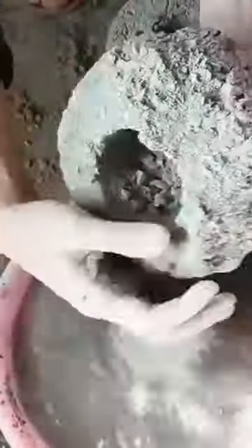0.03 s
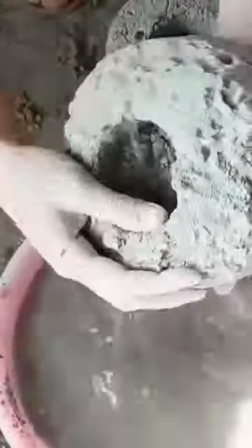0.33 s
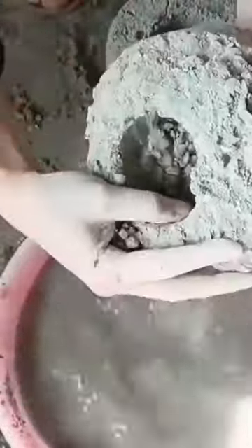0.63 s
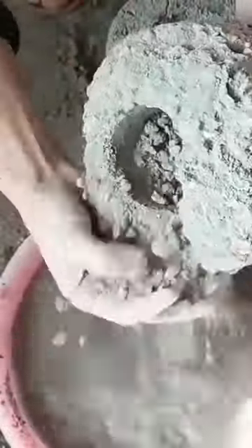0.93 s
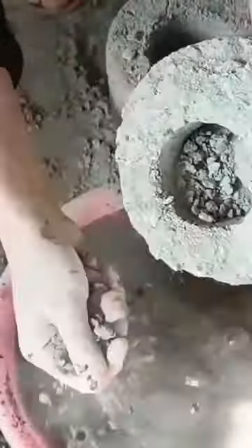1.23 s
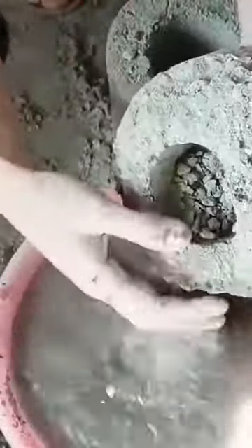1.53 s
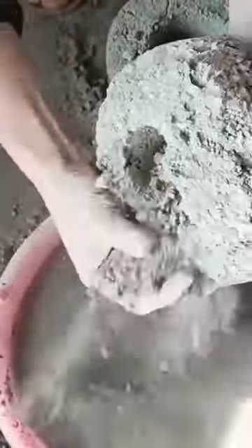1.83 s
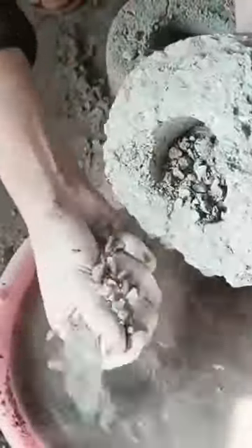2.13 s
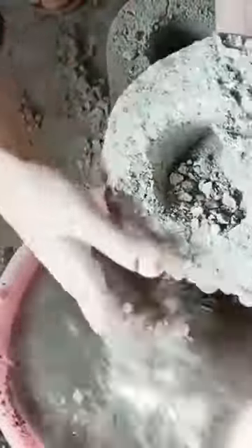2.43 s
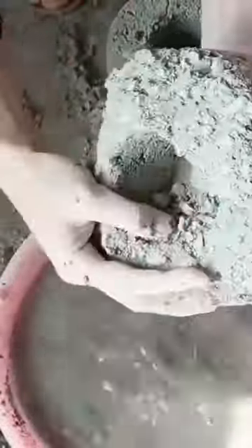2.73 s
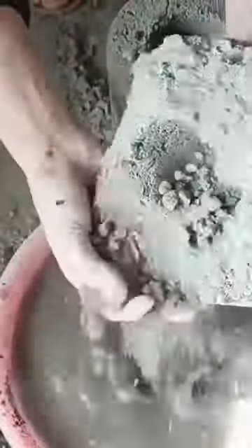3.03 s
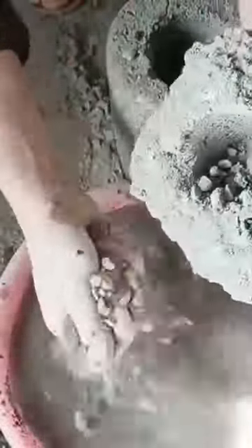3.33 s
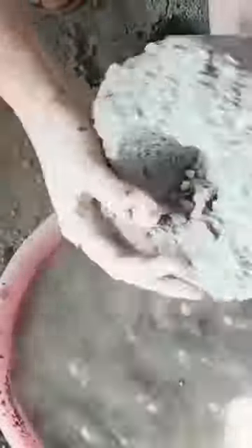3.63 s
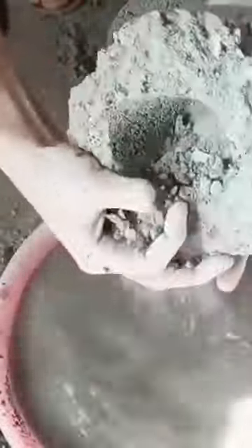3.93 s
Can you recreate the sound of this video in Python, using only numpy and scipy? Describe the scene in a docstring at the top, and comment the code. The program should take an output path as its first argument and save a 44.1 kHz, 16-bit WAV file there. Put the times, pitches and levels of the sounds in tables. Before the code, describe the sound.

Dry cement crunches and snaps as a hand squeezes it again and again. After each squeeze, sand showers and lumps splash into a tub of water with small bubbles, heard up close in a small hard room.

```python
"""First comes a plop and a hiss of sand on water, then a crunch: close to the microphone, a hand is
crumbling a dry block of cement and sand over a plastic tub of water. Each squeeze breaks loose a rush
of grains, and chips snap off. Lumps smack the water and trap ringing air bubbles; showers of sand
patter on it and stir up smaller ones. A small hard room hums faintly and throws the sound back,
and a limiter holds down the loudest peaks."""
import sys
import numpy as np
from scipy import signal
from scipy.fft import rfft, irfft
from scipy.io import wavfile
from scipy.ndimage import uniform_filter1d, minimum_filter1d

SR = 44100
rng = np.random.default_rng(int(sys.argv[2]) if len(sys.argv) > 2 else 0)


def waveform_to_disk(signal):
    """Save audio, clipped to [-1, 1], as 16-bit WAV at the path in sys.argv[1]."""
    frames = np.transpose(np.atleast_2d(signal))
    scaled = np.clip(frames, -1, 1) * 32767
    samples = np.round(scaled).astype(np.int16)
    wavfile.write(sys.argv[1], SR, samples)


N = 176400  # 4 seconds


def amp(db):
    """Turns decibels into a number to multiply by."""
    return 10 ** (np.asarray(db) / 20)


def normalised(x):
    """Scales a signal to an average power of 1."""
    return x / np.sqrt(np.mean(x ** 2) + 1e-20)


def value_at(points, hz):
    """Looks up a frequency in a table, blending between rows on a scale of octaves."""
    row_hz, value = np.transpose(points)
    return np.interp(np.log(hz + 1), np.log(row_hz + 1), value)


def volume_curve(points):
    """Joins rows of seconds and dB into one gain for every sample."""
    return amp(np.interp(np.arange(N) / SR, *np.transpose(points)))


def add(mix, start_s, sound):
    """Adds a sound to the mix, cutting off whatever runs past the end."""
    part = mix[:, max(round(start_s * SR), 0):][:, :sound.shape[-1]]
    part += sound[..., :part.shape[1]]


def colour(x, tone, keep_power=True, size=2048):
    """Makes some frequencies louder and others softer, following a tone table."""
    gain = amp(value_at(tone, abs(np.fft.fftfreq(size, 1 / SR))))
    gain = normalised(gain) if keep_power else gain
    spectrum = np.exp(np.conj(signal.hilbert(np.log(gain))))  # rings only after a hit, never before
    taps = np.fft.ifft(spectrum).real
    return signal.oaconvolve(x, taps[None], axes=1)[:, :x.shape[1]]


# How alike the two sides are. Each row: frequency in Hz, likeness from 0 (unrelated) to 1 (the same).
STEREO_LIKENESS = [(30, 0.23), (150, 0.82), (700, 0.57), (1300, 0.68), (2500, 0.59), (4500, 0.06)]

def noise(size):
    """Stereo white noise: left and right are partly alike lower down, unrelated in the treble."""
    left, other = rfft(rng.standard_normal((2, size)))
    likeness = value_at(STEREO_LIKENESS, np.fft.rfftfreq(size, 1 / SR))
    right = likeness * left + np.sqrt(1 - likeness ** 2) * other
    return irfft(np.array([left, right]), size)


def scatter(sound, per_s, spread_db):
    """Repeats a sound at random times. A positive spread makes a few much louder, a negative softer."""
    hits = rng.random(N) < per_s / SR
    strengths = amp(spread_db * np.minimum(rng.exponential(1, N), 5))
    return signal.oaconvolve((hits * strengths)[None], sound, axes=1)[:, :N]


def grit(per_s, spread_db, kinds=20, size=384, fade_s=0.00088, clump_s=0.0085, clump_db=2.5):
    """A stream of tiny sharp grains of many kinds, bunched in clumps."""
    fade = np.exp(-np.arange(size) / SR / fade_s)
    grains = sum(scatter(normalised(noise(size) * fade), per_s / kinds, spread_db) for _ in range(kinds))
    clumps = normalised(uniform_filter1d(rng.standard_normal(N), int(clump_s * SR)))
    return normalised(grains * amp(clump_db * clumps))


def dull_ring(size, low_hz, high_hz, width_hz=580):
    """Cement is full of pores and rings only dully: a broad band of noise around a random pitch."""
    hz = rng.uniform(low_hz, high_hz)
    resonance = signal.iirpeak(hz, hz / width_hz, fs=SR)
    return normalised(signal.lfilter(*resonance, noise(size)))


# The tone of the room's hum. Each row: frequency in Hz, relative level in dB.
HUM_TONE = [(40, -20.5), (150, 2), (195, -3.5), (211, 8.5), (230, -2.5), (400, -1),
            (700, -21.5), (9000, -26)]

def room_hum():
    """The room hums low and steady: faint noise, strongest near 211 Hz."""
    return amp(-38.5) * colour(noise(N), HUM_TONE, size=8192)


# How long the room rings. Each row: frequency in Hz, seconds to fade by 60 dB.
ECHO_FADE = [(200, 1), (600, 0.21), (7000, 0.15)]

def room_echo(x, size=16384, rise_s=0.0072):
    """Hard walls throw the sound back as a short blur in which the bass lasts longest."""
    hz, t, bands = signal.stft(noise(size), SR, nperseg=256)
    fade = amp(-60 * t / value_at(ECHO_FADE, hz)[:, None])
    tail = signal.istft(bands * fade, SR, nperseg=256)[1]
    tail *= np.minimum(np.arange(tail.shape[1]) / SR / rise_s, 1)
    return signal.fftconvolve(x, tail / np.linalg.norm(tail[0]), axes=1)[:, :N]


def bubble(hz, glide, life_cycles=5.46, size=2000):
    """Trapped air rings briefly and rises in pitch; glide is the share of pitch gained each cycle."""
    lag_s = rng.normal() * 0.00006  # the sound reaches one side slightly first
    cycles = hz * np.maximum(np.arange(size) / SR + np.array([[lag_s], [-lag_s]]), 0)
    rise = 1 - np.exp(-cycles / 0.39)
    fade = np.exp(-(cycles / life_cycles) ** 2)
    return rise * fade * np.sin(2 * np.pi * cycles * (1 + glide * (cycles - life_cycles) / 2))


# How strongly the water bubbles and splashes. Each row: time in seconds, level in dB.
BUBBLING_LEVEL = [(0, -24.5), (.2, -25.5), (.32, -36.5), (.75, -52.5), (1.0, -32.5), (1.25, -36),
                  (1.33, -24.5), (1.57, -30.5), (1.64, -32.5), (1.8, -55), (2.0, -26.5), (2.23, -34),
                  (2.28, -28.5), (2.59, -18), (2.66, -39.5), (2.95, -38.5), (3.08, -29), (3.4, -25.5),
                  (3.68, -27.5), (3.82, -41)]
# The tone of the splashing. Each row: frequency in Hz, relative level in dB.
SPLASH_TONE = [(200, -32), (720, -6), (14000, -47)]

def bubbling_water(kinds=32, per_s=520, low_hz=654, high_hz=3166, db_per_octave=-2.5):
    """Showers of crumbs splash and stir up small bubbles; the higher ones are softer."""
    bubbles = np.zeros((2, N))
    for hz in np.geomspace(low_hz, high_hz, kinds):
        life_cycles = 4.77 * np.sqrt(hz / low_hz) * (0.5 + rng.random())
        ring = bubble(hz, glide=0.056 * rng.random(), life_cycles=life_cycles)
        gain = amp(db_per_octave * np.log2(hz / low_hz))
        bubbles += gain * scatter(ring, per_s / kinds, spread_db=4.5)
    splash = colour(grit(per_s=6000, spread_db=-9), SPLASH_TONE)
    return (normalised(bubbles) + amp(-7.5) * splash) * volume_curve(BUBBLING_LEVEL)


# The flow of falling sand. Each row: time in seconds, level in dB.
SAND_FLOW = [(0, -17), (.2, -21.5), (.3, -31.5), (.35, -22.5), (.44, -29.5), (.52, -26.5), (.75, -34.5),
             (.83, -34), (.97, -27), (1.22, -31.5), (1.3, -18), (1.58, -22), (1.64, -32), (1.79, -30.5),
             (1.97, -25), (2.12, -29.5), (2.28, -19), (2.42, -22.5), (2.53, -15), (2.62, -23.5),
             (2.68, -20), (2.8, -29.5), (3.0, -21.5), (3.2, -29.5), (3.32, -20.5), (3.68, -19.5),
             (3.76, -26)]
# The tone of its hiss. Each row: frequency in Hz, relative level in dB.
SAND_TONE = [(100, -14.5), (350, -6), (800, -8.5), (3500, 0), (7300, -0.5), (15500, -3)]

def falling_sand(kinds=24, size=500, ticks_per_s=170, tick_s=0.0016):
    """Fine sand hisses on the water, and each kind of coarser grain ticks at its own pitch."""
    hiss = colour(grit(per_s=6000, spread_db=-9), SAND_TONE)
    fade = np.exp(-np.arange(size) / SR / tick_s)
    ticks = np.zeros((2, N))
    for _ in range(kinds):
        tick = dull_ring(size, low_hz=1720, high_hz=8340) * fade
        ticks += scatter(tick, ticks_per_s / kinds, spread_db=4)
    return (hiss + amp(-9.5) * normalised(ticks)) * volume_curve(SAND_FLOW)


# Lumps landing in the water. Each row: start in seconds, bubble pitch in Hz, relative level in dB.
LUMPS = [(0.001, 940, -0.5), (0.016, 1130, -10), (0.159, 810, -16), (0.193, 775, -16), (0.283, 696, -21.5),
         (0.996, 583, -9.5), (1.077, 1200, -17), (1.114, 1640, -15), (1.164, 507, -14), (1.198, 1620, -16),
         (1.421, 1350, -19), (1.4693, 954, -12.5), (1.489, 1120, -14), (1.531, 805, -14), (1.552, 833, -13),
         (1.564, 765, -16), (1.942, 705, -8), (1.998, 740, -7), (2.02, 1250, -8), (2.062, 840, -16),
         (2.076, 2100, -15), (2.255, 580, -19), (2.299, 1660, -3.5), (2.326, 855, -10.5), (2.368, 758, -10),
         (2.411, 755, -6.5), (2.430, 990, -12), (2.567, 1120, -15), (2.601, 1620, -10.5),
         (3.072, 667, -0.5), (3.102, 1530, -14), (3.143, 660, -15.5), (3.205, 608, -7), (3.484, 763, -17.5),
         (3.692, 742, -16.5), (3.775, 1170, -16), (3.932, 2150, -12), (3.972, 2340, -2.5)]
# The dull tone of a lump's smack or a chip's knock. Each row: frequency in Hz, relative level in dB.
IMPACT_TONE = [(60, -38), (400, -7), (1100, -2), (2500, -2.5), (5000, -8.5), (15000, -50)]

def plopping_lumps(size=2000, smack_s=0.0057, followers=3, follow_s=0.04):
    """Each lump smacks the water and traps a ringing bubble; a few smaller, higher ones follow."""
    bubbles, smacks = np.zeros((2, 2, N))
    smack_fade = np.exp(-np.arange(size) / SR / smack_s)
    for start, hz, db in LUMPS:
        add(bubbles, start, amp(db + 4.5) * bubble(hz, glide=0.009))
        for lateness, octaves_up in rng.random((followers, 2)):
            small_bubble = bubble(hz * 2 ** octaves_up, glide=0.028)
            add(bubbles, start + follow_s * lateness, amp(db - 16) * small_bubble)
        add(smacks, start, amp(db - 11) * noise(size) * smack_fade)
    return bubbles + colour(smacks, IMPACT_TONE)


# Chips snapping off or striking. Each row: start in seconds, relative snap and knock levels in dB.
CHIPS = [(0.06, -3, -24), (0.131, -3, -22), (.228, -13, -16), (.272, -13, -14), (.324, -14, -13),
         (0.4688, -10, -19.5), (0.4851, -7.5, -6.5), (.587, -34, -20.5), (0.9784, -9, -27),
         (1.031, -17, -29), (1.112, -19, -20), (1.153, -15.5, -16.5), (1.441, -7.5, -12), (1.482, -8, -36),
         (1.489, -23, -39), (1.535, -10, -26), (1.558, 1, -5.5), (1.595, -2.5, -13.5), (1.6483, -7, -21),
         (1.679, -16, -15), (1.697, -13, -20), (1.995, -1, -18), (2.073, -16.5, -18), (2.153, -15.5, -21),
         (2.345, -9, -19), (2.37, -12.5, -21), (2.412, -0.5, -30), (2.444, -13.5, -20), (2.575, -2, -12),
         (2.6307, -12.5, -11), (2.6547, -11, -17.5), (2.8316, -5.5, -12), (2.989, -23, -23),
         (3.068, -13.5, -4.5), (3.08, -6, -7), (3.138, -9.5, -22), (3.1748, -14.5, -36), (3.188, -18, -45),
         (3.501, -13, -32), (3.549, -5.5, -11), (3.657, -3, -9.5), (3.729, -13, -32), (3.774, -9, -15),
         (3.928, -8.5, -13.5), (3.9703, -0.5, -4.5)]
# The bright tone of a snap. Each row: frequency in Hz, relative level in dB.
SNAP_TONE = [(300, -19), (2500, -24), (5500, 6), (15500, -1)]

def snapping_chips(size=1000, snap_s=0.0013, knock_s=0.0045, after_snaps=2, break_s=0.005):
    """A chip breaks with one sharp snap and a few weaker ones, over a duller knock and a clink."""
    snaps, rings, knocks = np.zeros((3, 2, N))
    t = np.arange(size) / SR
    knock_fade = np.exp(-t / knock_s)
    for start, snap_db, knock_db in CHIPS:
        snap_shape = np.exp(-t / snap_s)
        for delay in break_s * rng.random(after_snaps):
            snap_shape += 0.5 * (t > delay) * np.exp(-abs(t - delay) / snap_s)
        add(snaps, start, amp(snap_db + 3) * noise(size) * snap_shape)
        add(rings, start, amp(snap_db - 3) * dull_ring(size, low_hz=6700, high_hz=7300) * snap_shape)
        add(knocks, start, amp(knock_db - 0.5) * noise(size) * knock_fade)
        add(rings, start, amp(knock_db - 8) * dull_ring(size, low_hz=1840, high_hz=3360) * knock_fade)
    return colour(snaps, SNAP_TONE) + rings + colour(knocks, IMPACT_TONE)


# Squeezes of the hand. Each row: start in seconds, level in dB, seconds to rise,
# seconds to fade to about a third.
SQUEEZES = [(0.125, -8.5, 0.011, 0.075), (0.643, -14, 0.003, 0.022), (0.844, -13, 0.015, 0.025),
            (1.81, -5.5, 0.0054, 0.02), (1.919, -9, 0.0049, 0.037), (2.894, -9, 0.0074, 0.021),
            (3.684, -12, 0.024, 0.02)]
# The tone of the crunch. Each row: frequency in Hz, relative level in dB.
CRUNCH_TONE = [(100, -19), (400, -10.5), (1200, -1.5), (2200, -4.5), (4000, -2.5), (7300, -2), (15500, -8)]

def crunching_block():
    """Under each squeeze, grains break loose in a rush that dies away."""
    t = np.arange(N) / SR
    rush = np.zeros(N)
    for start, db, rise_s, fade_s in SQUEEZES:
        rise = np.clip((t - start) / rise_s, 0, 1)
        fade = np.exp(-np.maximum(t - start - rise_s, 0) / fade_s)
        rush += amp(db) * rise * fade
    return colour(grit(per_s=7100, spread_db=2.5) * rush, CRUNCH_TONE)


def scene():
    """Mixes the room's hum and echo with the water and the crumbling cement."""
    water = bubbling_water() + plopping_lumps()
    cement = falling_sand() + snapping_chips() + crunching_block()
    echo = room_echo(amp(-12.5) * water + amp(-10.5) * cement)
    return room_hum() + echo + water + cement


# The microphone's tone. Each row: frequency in Hz, left gain in dB, right gain in dB.
MIC_TONE = [(20, 3.5, 2), (2500, 3.5, 3.5), (5400, 5.5, 3), (7830, 12.5, 10.5), (8020, -1, 6),
            (8290, 12, 16), (8700, 0, 1)]

def record(dry, ceiling=1.287, limiter_s=0.0008, top_hz=15750):
    """The microphone colours the sound; peaks are turned down, then clipped; the top treble is cut."""
    tones = np.array(MIC_TONE)
    left = colour(dry[[0]], tones[:, [0, 1]], keep_power=False)
    right = colour(dry[[1]], tones[:, [0, 2]], keep_power=False)
    stereo = np.vstack([left, right])
    span = int(limiter_s * SR)
    needed_gain = np.minimum(ceiling / (abs(stereo).max(0) + 1e-9), 1)
    smooth_gain = uniform_filter1d(minimum_filter1d(needed_gain, span), span)
    clipped = np.clip(stereo * smooth_gain, -1, 1)
    treble_cut = signal.firwin(301, top_hz, window=("kaiser", 8), fs=SR)
    return signal.oaconvolve(clipped, treble_cut[None], "same")


dry = scene()
out = record(dry)
waveform_to_disk(out)
```